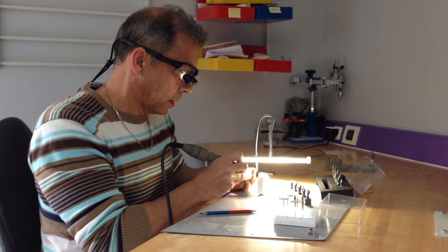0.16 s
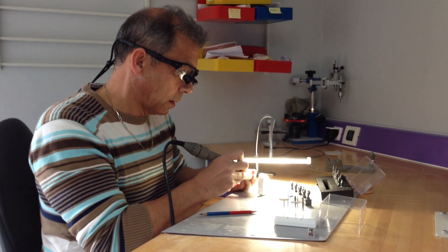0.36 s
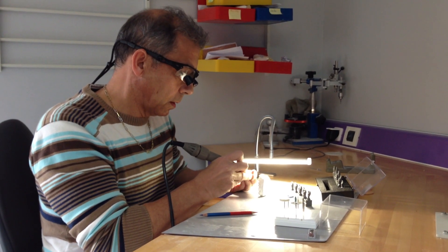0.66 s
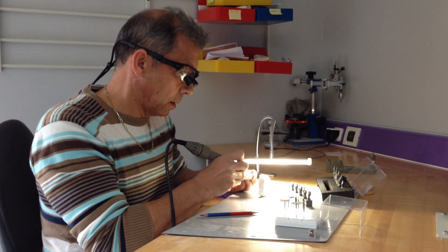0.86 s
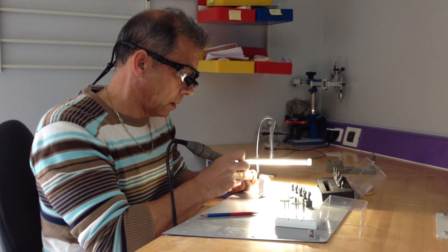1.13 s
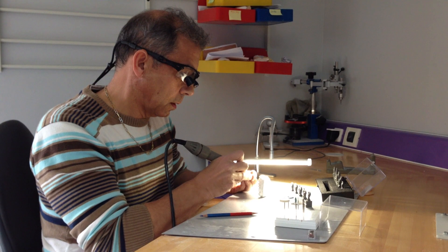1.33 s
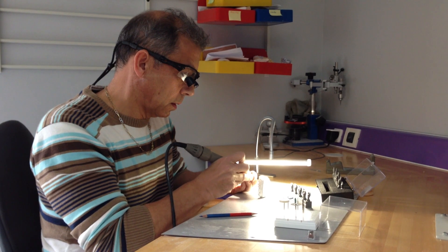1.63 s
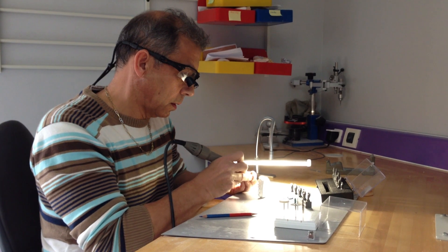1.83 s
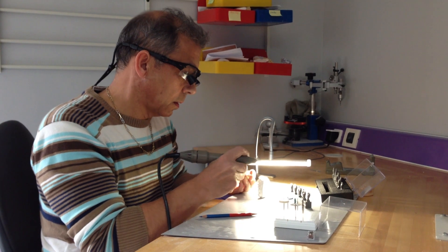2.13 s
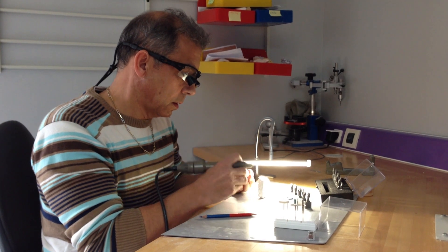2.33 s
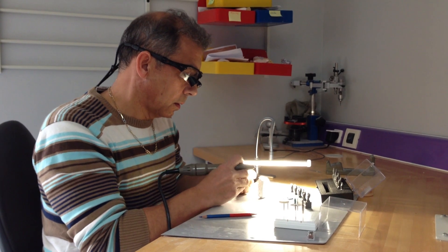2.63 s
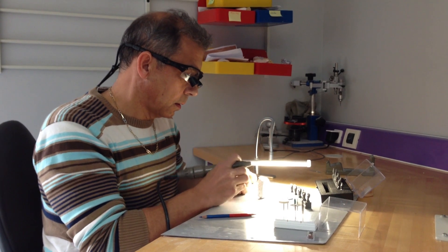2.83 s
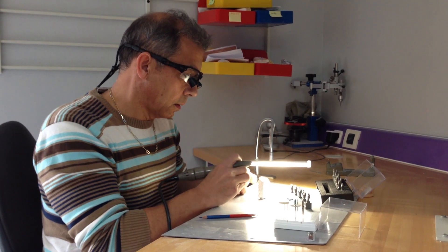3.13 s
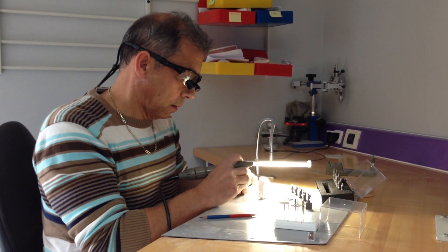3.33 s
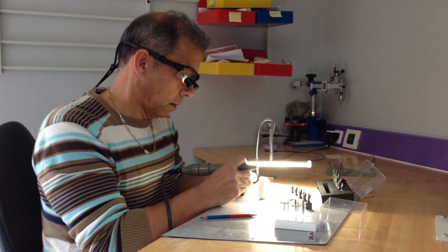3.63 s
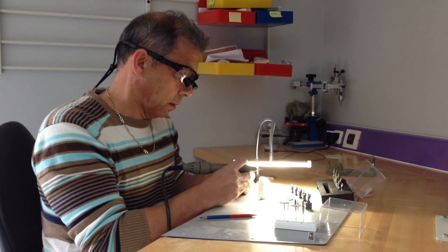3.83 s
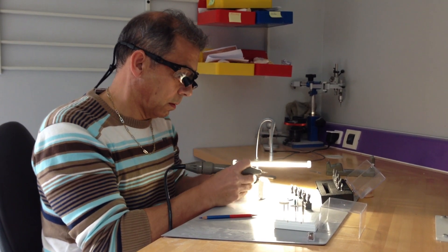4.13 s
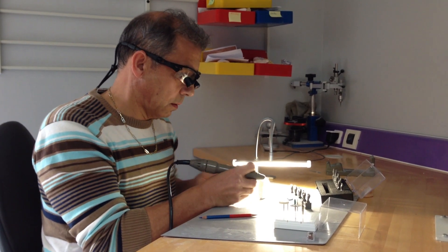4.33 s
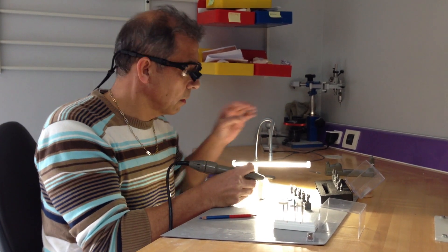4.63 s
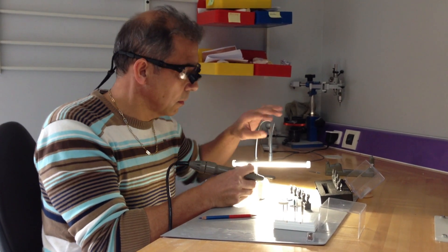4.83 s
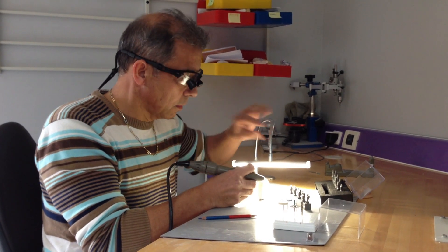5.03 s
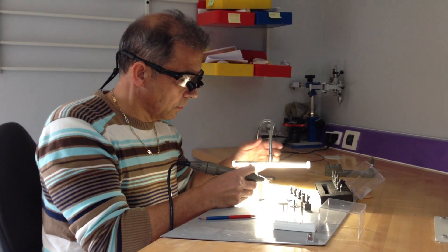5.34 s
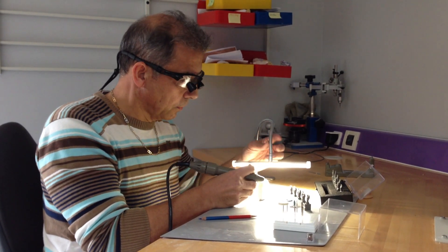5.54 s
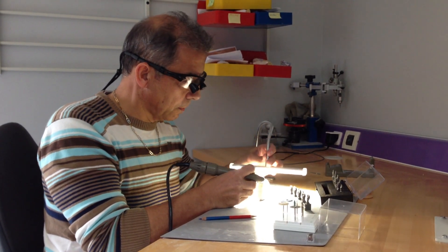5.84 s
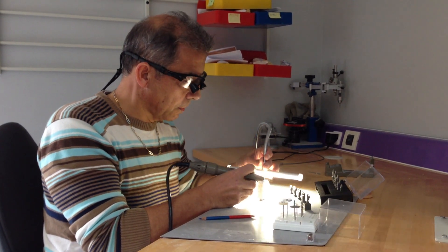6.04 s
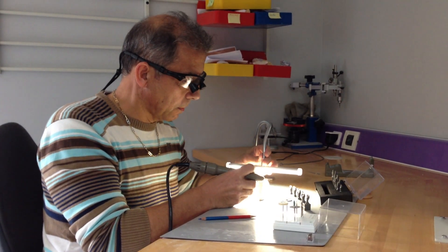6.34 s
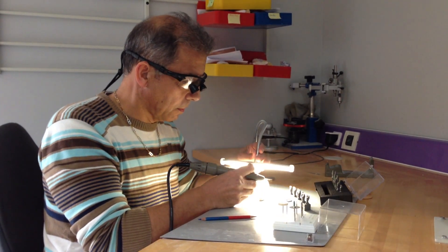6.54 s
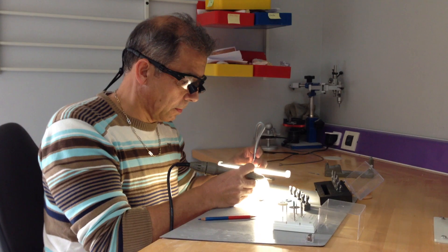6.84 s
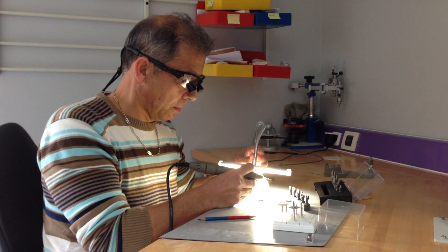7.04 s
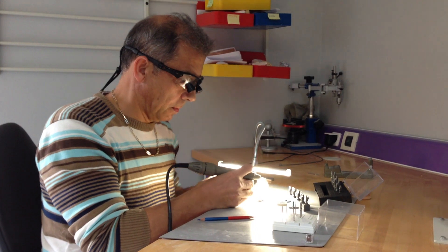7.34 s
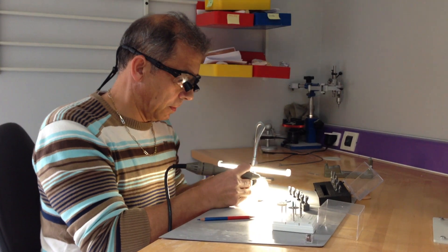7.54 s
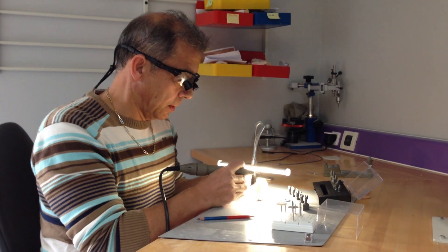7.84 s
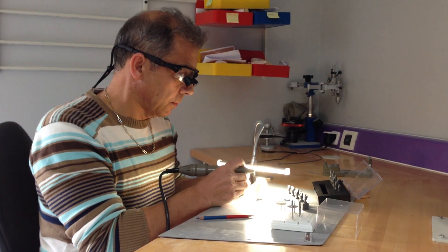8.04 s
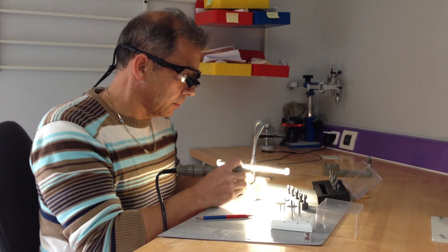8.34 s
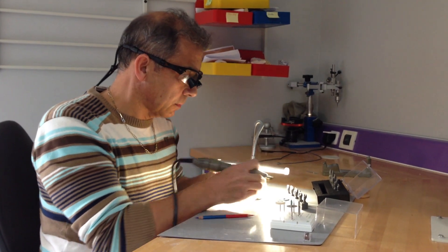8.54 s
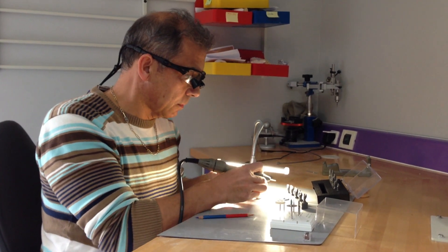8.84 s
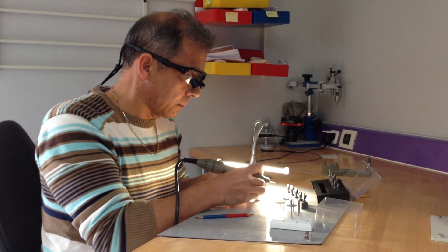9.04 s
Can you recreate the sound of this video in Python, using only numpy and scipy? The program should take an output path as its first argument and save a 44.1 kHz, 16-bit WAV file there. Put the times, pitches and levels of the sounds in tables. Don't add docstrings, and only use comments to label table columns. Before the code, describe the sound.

In a small dental lab, close to the worker's hands, a micromotor handpiece whines piercingly over a singing dust extractor and faint mains hum. Several short buzzing scratches come in the first two seconds. The whine then slides down, settles at a lower idle, and much later a shoe scuffs, the foot control knocks dully, and the pitch sweeps back up.

```python
import sys
import numpy as np
from scipy import signal
from scipy.fft import rfft, irfft, next_fast_len
from scipy.io import wavfile
from scipy.ndimage import uniform_filter1d, minimum_filter1d, map_coordinates

SR = 44100
rng = np.random.default_rng(int(sys.argv[2]) if len(sys.argv) > 2 else 0)


def boost_factor(decibels):
    exponent = np.asarray(decibels, float) / 20
    return 10 ** exponent


def inscribe(sig):
    pcm = np.round(np.clip(np.atleast_2d(sig).T, -1, 1) * 32767)
    wavfile.write(sys.argv[1], SR, pcm.astype(np.int16))


N = 404838

# order [multiple of shaft speed], level_db
WEAK_ORDERS = [(3, -66), (5.35, -54), (10, -57), (13, -63), (16.51, -64), (17.11, -56), (18, -55.5),
               (19, -64), (20, -56.5), (24, -62), (24.46, -58), (25, -60), (26, -63), (26.45, -59),
               (27, -59), (27.26, -59), (27.85, -55), (28.82, -61), (29.62, -61), (31.22, -57), (33, -62),
               (35, -63), (36, -64), (38, -66)]
# pitch_hz, gain_db
CASING = [(1000, -4.5), (1500, -19.5), (1900, 3.5), (2150, -10), (3000, -6), (5000, -18), (6400, 0),
          (7500, -8.5), (9000, -19), (11000, -30), (15000, -15)]
# time_s, order_9_level_db
AIM = [(0, -44.5), (1.04, -45), (1.6, -45), (2.0, -44), (2.12, -52), (3.12, -54.5), (3.54, -43),
       (3.85, -44), (3.92, -54), (4.28, -51.5), (4.57, -43), (4.8, -67), (5.24, -56.5), (5.65, -45.5),
       (7.83, -50), (7.9, -65), (8.23, -44.5), (8.6, -57.5)]
# start_s, length_s, gain_db
SWELLS = [(.27, .08, -3), (.59, .02, 3), (1.22, .01, 5.5), (1.83, .01, -5), (1.87, .005, 2),
          (2.44, .01, 7.5), (2.56, .03, 9), (2.71, .02, 6), (2.93, .01, 2), (3.02, .01, 2), (3.2, 0.045, 6),
          (8.1, 0.022, 4), (8.36, 0.13, 2), (8.71, .07, 4), (8.83, 0.029, 6), (8.97, .01, 9),
          (9.11, .01, 5)]
# pitch_hz, order_15_level_db
NOSE = [(3400, -63), (4100, -63), (4600, -56), (5050, -52), (5450, -47), (5650, -39), (5930, -32.5)]
# start_s, length_s, loss_db
NOSE_DIPS = [(0, .01, 2), (.27, 0.036, 3), (.16, .1, 1.5), (.52, .08, 2.5), (.635, .035, -1), (.7, 0.0045, 1.5),
             (.775, .005, -1), (1.26, .01, -1), (1.335, 0.0073, 3.5), (1.378, 0.0043, 1), (1.43, .02, 3.5),
             (1.7, .15, 0.5), (1.9, .005, 2.5), (2.12, 0.076, 2), (2.235, .03, 5.5), (2.31, .04, 0),
             (2.43, 0.076, 5), (2.69, .02, 2), (2.92, .08, 6), (8.18, .01, 6), (8.29, .01, 8), (8.58, .07, 3.5),
             (8.82, 0.011, 9), (8.77, .01, 4), (8.88, .03, -1), (8.97, .01, 3), (9.11, 0.023, 18)]
# pitch_hz, level_db
COOLING_AIR = [(2500, -22), (4000, -0.5), (6200, -3), (7200, -4), (8300, -14.5), (9600, -1), (11500, -7),
               (13500, -7), (15500, -10)]
# time_s, speed_rps [turns per s]
FAN_SPEED = [(0.0, 268.1), (1.09, 270.6), (2.12, 273.4), (3.03, 274.9), (4.31, 275.7), (5.15, 275.5),
             (5.87, 274.4), (6.53, 274.3), (7.12, 273.6), (8.02, 274.6), (9.18, 274.8)]
# time_s, level_db
BLADE = [(.14, -39.5), (.46, -42), (.88, -57), (1.56, -47.5), (1.91, -38), (2.55, -45.5), (3.03, -36.5),
         (3.66, -39), (4, -44.5), (4.42, -42.5), (5.15, -48), (5.58, -35.5), (5.87, -45), (6.6, -48),
         (7.12, -44), (8.25, -39), (8.68, -42.5), (9.0, -36.5)]
# start_s, length_s, loss_db
ARM = [(0, 0.041, 13), (.3, .01, 4), (.58, 0.012, 4), (1.63, 0.24, 10.5), (1.98, 0.0083, 7),
       (2.12, 0.016, 6), (2.42, 0.075, 11), (4.57, 0.29, 8.5), (4.92, 0.175, 13), (5.17, 0.23, -2.5),
       (6.29, .01, 3), (6.65, 0.38, 9), (7.25, 0.11, 4), (7.4, .35, 15), (7.91, 0.045, 2.5)]
# pitch_hz, level_db
RUSH = [(24, -75), (40, -50), (143, -14.5), (188, -6.5), (273, -13.5), (359, -15.5), (926, -8.5),
        (1220, -9.5), (1380, -12.5), (2010, 0.5), (3220, -12.5), (5720, -14), (6320, -9.5), (13700, -23.5),
        (15500, -29)]
# pitch_hz, width_hz, height_db [over the rush]
DUCT = [(778, 60, 8.5), (897, 35, 5), (965, 63, 7), (1100, 50, 3), (1220, 77, 4), (2050, 510, -7.5),
        (9020, 580, 5.5)]
# pitch_hz, level_db
MAINS = [
    (100, -80.5),
    (199.8, -56),
    (300, -64),
]
# start_s, length_s, body_level_db, edge_over_body_db
TOUCHES = [(0.055, .005, -42, 2), (.385, .05, -54, 6), (0.577, .02, -39, -5.5), (0.593, 0.027, -33.5, -2),
           (0.627, 0.048, -33, 0.5), (0.707, 0.029, -47, 3.5), (0.907, 0.054, -47.5, 5),
           (1.165, .06, -45.5, 4), (1.206, 0.042, -39.5, 1.5), (1.272, 0.062, -37.5, 0.5),
           (1.365, 0.025, -39.5, 2.5), (1.395, 0.031, -40.5, -1.5), (1.813, .04, -44.5, 0.5),
           (1.845, 0.036, -39, 2)]
# pitch_hz, level_db
WORKPIECE = [(300, -90), (700, -46), (1200, -34), (2000, -14), (2800, -13), (3400, -14), (3950, -8),
             (4350, -14), (4750, 1), (5150, -1), (5550, -9), (6200, -30)]
# pitch_hz, level_db
BUR_EDGE = [(3000, -90), (5300, -21), (5900, 3), (6300, -1), (6750, 0), (7100, -4), (7900, -15),
            (8700, -14), (9300, -14), (9900, -14), (11500, -21), (13500, -19), (15500, -28)]
# start_s, level_db, pitch_hz, t60_s
KNOCKS = [
    (7.854, -28, 316, 0.08),
    (7.872, -31, 990, .05),
    (7.904, -38, 1810, 0.028),
    (7.915, -38, 1060, .05),
    (7.965, -38, 1120, .04),
    (5.98, -44, 425, .08),
]
# time_s, level_db
SCUFF = [
    (7.82, -58),
    (7.85, -53),
    (7.868, -41),
    (7.92, -44),
    (7.972, -48),
    (8.012, -55),
    (8.02, -52),
]
# pitch_hz, level_db
SOLE = [(150, -43), (250, -7), (284, -7.5), (1020, -13), (1640, -9.5), (2400, -12), (4000, -18),
        (5200, -51), (8800, -120)]
# pitch_hz, threshold_db
MASK = [(300, -40), (1000, -14), (3000, -9), (7000, -6), (10500, -4.5), (12500, -2.2), (15400, -1.2)]
# pitch_hz, threshold_db
SHADOW = [(300, -60), (2700, -29), (6200, -36), (12300, -23), (15400, -25)]

TOP_HZ = 15350
FULL_RPS, IDLE_RPS, RESTART_RPS = 395.3, 229.0, 391.0
RELEASE_S, COAST_S, DRAG_RPS = 2.211, 3.03, 141
CATCH_S, SETTLE_S = 3.2, 0.28
PRESS_S, RISE_S = 7.872, 0.343
LOAD_RPS, LAG_S = 1.1, 0.033
QUIET_DB, PRESS_LOSS_DB = -69, 5
TWIN_DB, TWIN_FALL = -50, 0.66
BEARING_DB, BEARING_FALL = -53.5, 0.2
GLIDE_FADE_DB, FLUTTER_PER_S = 2.0, 50
EDGE_S = 0.048
ROTOR_DB, BENCH_HZ, OFF_DB = -49.5, 271.88, 0.39
RUSH_DB = -44
ATTACK_DB_S, RELEASE_DB_S = 650, 420
CHATTER_DB, SKIP_RAD = 0.8, 0.05
SCRATCH_DB, WEAR_DB, WEAR_FROM_S, WEAR_S = -10.5, 10, 1.0, 0.35


def unit(x):
    return x / np.sqrt(np.mean(x ** 2) + 1e-20)


def curves(rows, outside=None):
    s, *cols = np.transpose(rows)
    return [np.interp(np.arange(N) / SR, s, c, outside, outside) for c in cols]


def wobble(rate):
    return map_coordinates(rng.standard_normal(int(N * rate / SR) + 4), [np.arange(N) * rate / SR])


def along(points, hz):
    f, v = np.transpose(points)
    return np.interp(np.log(hz + 1), np.log(f + 1), v)


def coloured(x, points, peaks=()):
    m = next_fast_len(len(x) + 8192)
    hz = np.fft.rfftfreq(m, 1 / SR)
    lift_db = sum(db / (1 + (2 * (hz - c) / w) ** 2) for c, w, db in peaks)
    return unit(irfft(rfft(x, m) * boost_factor(along(points, hz) + lift_db), m)[:len(x)])


def patchy(patchy_db):
    z = signal.stft(rng.standard_normal(N + 512), nperseg=512)[2]
    field = uniform_filter1d(rng.standard_normal(z.shape), 6, 0)
    field = uniform_filter1d(field, 14, 1)
    return signal.istft(z * boost_factor(patchy_db * unit(field)), nperseg=512)[1][:N]


def tone(angle, db):
    return np.sqrt(2) * boost_factor(db) * np.sin(angle)


def shade(rows):
    t = np.arange(N) / SR
    return sum(db * np.clip(np.minimum(t - s, s + length - t) / EDGE_S + 1, 0, 1) for s, length, db in rows)


def handpiece():
    body_db, edge_db = pressure()
    firm = uniform_filter1d(np.clip((edge_db + 48) / 12, 0, 1), size=2000)
    firm = np.roll(firm, round(LAG_S * SR))
    speed = shaft(firm)
    angle = 2 * np.pi * np.cumsum(speed) / SR
    glide = np.clip(np.abs(uniform_filter1d(np.gradient(speed) * SR, 4000)) / 25, 0, 1)
    slower = FULL_RPS - speed

    slot_db = curves(AIM)[0] + shade(SWELLS) - PRESS_LOSS_DB * firm
    slot_db = slot_db + GLIDE_FADE_DB * glide * wobble(FLUTTER_PER_S)
    nose_db = along(NOSE, 15 * speed) - shade(NOSE_DIPS) + GLIDE_FADE_DB * glide * wobble(FLUTTER_PER_S)
    twin_db = np.maximum(TWIN_DB - TWIN_FALL * slower, QUIET_DB) + 0.66 * wobble(11)
    bearing_db = np.maximum(BEARING_DB - BEARING_FALL * slower, QUIET_DB) + 1.3 * wobble(8)
    strong = [(9, slot_db), (15, nose_db), (30, twin_db), (4.345, bearing_db)]
    whine = sum(tone(k * angle + 0.1 * wobble(30), db + 0.45 * wobble(40)) for k, db in strong)

    for k, db in WEAK_ORDERS:
        phase = k * angle + 0.4 * wobble(8)
        order_db = db + 1 + along(CASING, k * speed) + 2.2 * wobble(3)
        whine += tone(phase, order_db - 0.7 * max(k - 21, 0) * glide)
    whine = whine * (1 - 0.15 * glide) + boost_factor(-5) * room(whine * glide, t60=0.3)

    air_db = -49.5 + 4.8 * np.clip((speed - 229) / 166, 0, 1) ** 1.3 + 0.5 * wobble(3.07)
    air = boost_factor(air_db) * coloured(patchy(patchy_db=0.8), COOLING_AIR)
    return whine + air + bur(angle, body_db, edge_db)


def shaft(firm):
    t = np.arange(N) / SR

    def coast(s):
        return (FULL_RPS + DRAG_RPS) * np.exp(-np.maximum(s - RELEASE_S, 0) / COAST_S) - DRAG_RPS

    settle = IDLE_RPS + (coast(CATCH_S) - IDLE_RPS) / (1 + np.maximum(t - CATCH_S, 0) / SETTLE_S) ** 2
    rise = (RESTART_RPS - IDLE_RPS) * (1 - np.exp(-np.maximum(t - PRESS_S, 0) / RISE_S))
    speed = np.where(t < CATCH_S, coast(t), settle) + rise - LOAD_RPS * firm
    return uniform_filter1d(speed, size=3200)


def room(x, t60):
    tail = rng.standard_normal(SR // 2) * boost_factor(-60 * np.arange(SR // 2) / SR / t60)
    return signal.fftconvolve(x, tail / np.linalg.norm(tail))[:N]


def extractor():
    speed = curves(FAN_SPEED)[0]
    angle = 2 * np.pi * np.cumsum(speed) / SR
    blade_db = curves(BLADE)[0] - shade(ARM)
    rotor_db = ROTOR_DB - OFF_DB * (speed - BENCH_HZ) ** 2
    blades = tone(9 * angle + 0.15 * wobble(30), blade_db + 0.6 * wobble(25))
    rotor = tone(angle, rotor_db + 0.5 * wobble(10))
    bearing = tone(4.4 * angle + 0.5 * wobble(8), rotor_db - 7.5 + 1.5 * wobble(1.5))
    rush = boost_factor(RUSH_DB + 0.25 * wobble(2.58)) * coloured(patchy(patchy_db=1.08), RUSH, DUCT)
    return blades + rotor + bearing + rush


def hum():
    t = np.arange(N) / SR
    return sum(tone(2 * np.pi * hz * t + 0.21 * wobble(7.8), db + 1.1 * wobble(9)) for hz, db in MAINS)


def bur(angle, body_db, edge_db):
    angle = angle + SKIP_RAD * wobble(70)
    turn = np.round(angle / (2 * np.pi)).astype(int)
    click = np.sin(39.5 * angle) / (np.sin(angle / 2) + 1e-9) - 1
    click = click - 2 * np.cos(15 * angle) - 2 * np.cos(9 * angle)
    strikes = click * boost_factor(1.5 * rng.standard_normal(turn[-1] + 1))[turn]
    lean = 0.5 + 0.5 * np.sin(2.2 * wobble(22))
    strikes = sum(signal.fftconvolve(strikes * path, scatter(t60=0.03))[:N] for path in (lean, 1 - lean))

    scratch_db = SCRATCH_DB + WEAR_DB * np.clip((np.arange(N) / SR - WEAR_FROM_S) / WEAR_S, 0, 1)
    scratch = rng.standard_normal(N) * (1 + 0.3 * np.cos(angle))
    body = coloured(strikes, WORKPIECE) + boost_factor(scratch_db) * coloured(scratch, WORKPIECE)
    edge = coloured(strikes, BUR_EDGE) + boost_factor(scratch_db + 2.5) * coloured(scratch, BUR_EDGE)
    return boost_factor(body_db + 0.5) * body + boost_factor(edge_db + 2.5) * edge


def pressure():
    t = np.arange(N) / SR
    bodies, edges = [], []
    for s, length, db, edge_over_db in TOUCHES:
        before, after = np.maximum(s - t, 0), np.maximum(t - s - length, 0)
        level_db = db - ATTACK_DB_S * before - RELEASE_DB_S * after
        bodies.append(level_db)
        edges.append(level_db + edge_over_db)
    body_db = np.max(bodies, 0) + CHATTER_DB * wobble(44.5)
    edge_db = np.max(edges, 0) + CHATTER_DB * wobble(45)
    return body_db, edge_db


def scatter(t60):
    paths = rfft(rng.standard_normal(1024) * boost_factor(-60 * np.arange(1024) / SR / t60))
    return irfft(paths / np.abs(paths) ** 0.95)


def pedal():
    knocks, t = np.zeros(N + SR), np.arange(SR // 5) / SR
    for s, db, hz, t60 in KNOCKS:
        ring = boost_factor(db - 60 * t / t60) * np.sin(2 * np.pi * hz * t)
        knocks[round(s * SR):][:len(t)] += ring * (1 - np.exp(-t / 0.004))
    scuff_db = curves(SCUFF, outside=-120)[0] + 2.3 * wobble(90)
    return knocks[:N] + boost_factor(scuff_db) * coloured(rng.standard_normal(N), SOLE)


def scene():
    mono = handpiece() + extractor() + hum() + pedal()
    return np.array([mono, mono])


def top_cut(x):
    return signal.sosfilt(signal.butter(12, 16270, fs=SR, output="sos"), x)


def record(dry):
    frames = dict(fs=SR, nperseg=2048, noverlap=1024, window="cosine")
    hz, _, z = signal.stft(dry[0], **frames)
    power = np.abs(z) ** 2 + 1e-18
    local = uniform_filter1d(uniform_filter1d(power, size=5, axis=0), size=3, axis=1)
    around = uniform_filter1d(np.log(local), size=61, axis=0)
    around = np.exp(uniform_filter1d(around, size=9, axis=1))
    below = np.roll(-minimum_filter1d(-local, size=9, axis=0), 13, axis=0)
    floor = around * boost_factor(2 * along(MASK, hz))[:, None] + below * boost_factor(2 * along(SHADOW, hz))[:, None]
    z = z * (local > floor) * (hz < TOP_HZ)[:, None]

    draws = rng.random((z.shape[1], 2))
    centre_hz = 4500 * boost_factor(9 * draws[:, 1])
    filled = (np.abs(hz[:, None] / centre_hz - 1) < 0.09) * (draws[:, 0] < 0.08)
    apart = np.sqrt(around) * filled * np.exp(2j * np.pi * rng.random(z.shape))
    mid, side = signal.istft(np.array([z, apart]), **frames)[1][:, :N]
    return top_cut(np.array([mid + 1.1 * side, mid - 0.61 * side]))


dry = scene()
out = record(dry)
inscribe(out)
```